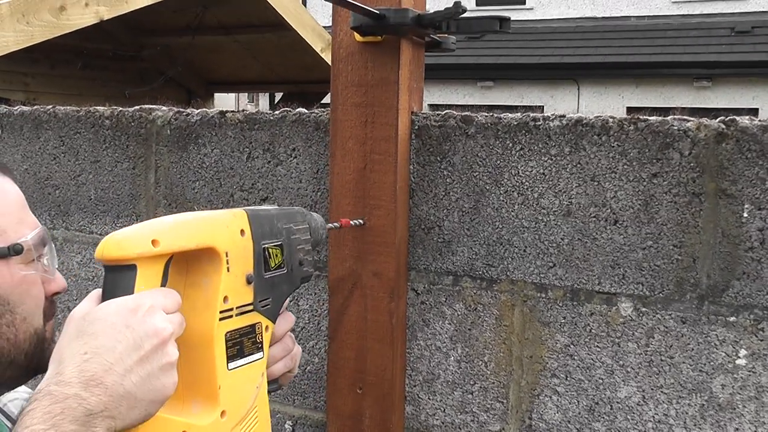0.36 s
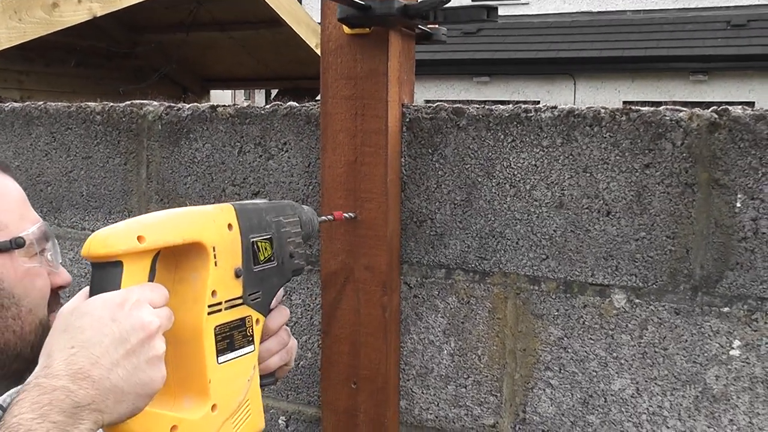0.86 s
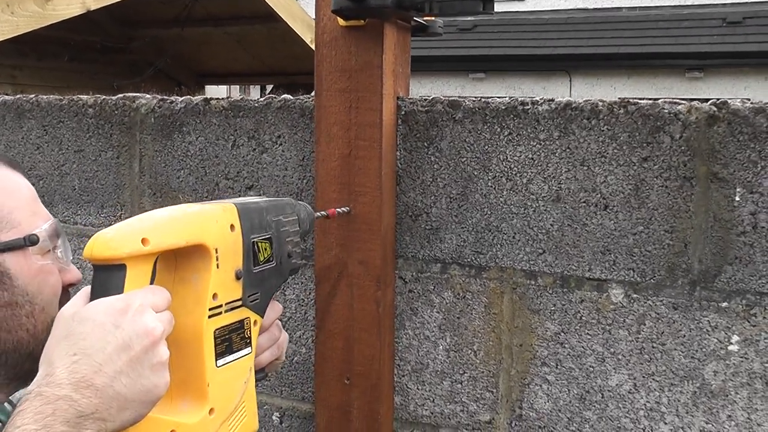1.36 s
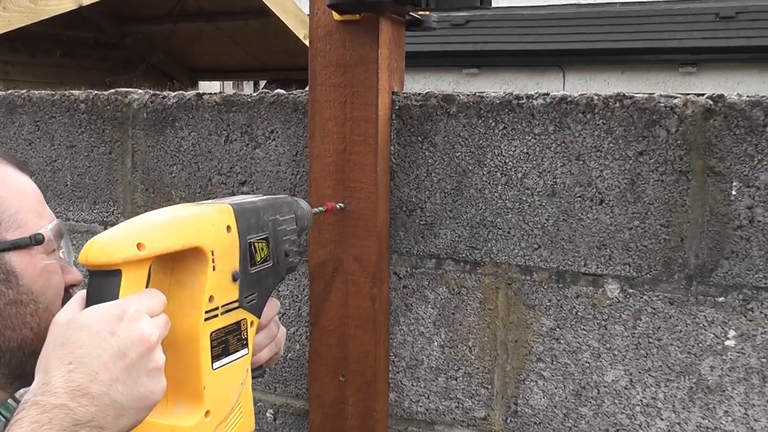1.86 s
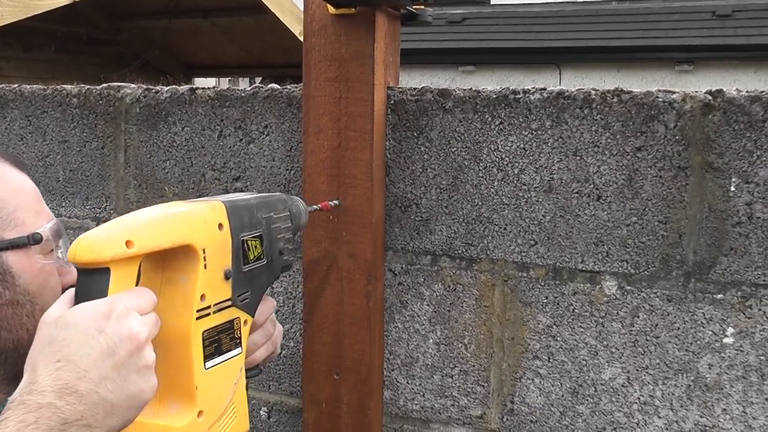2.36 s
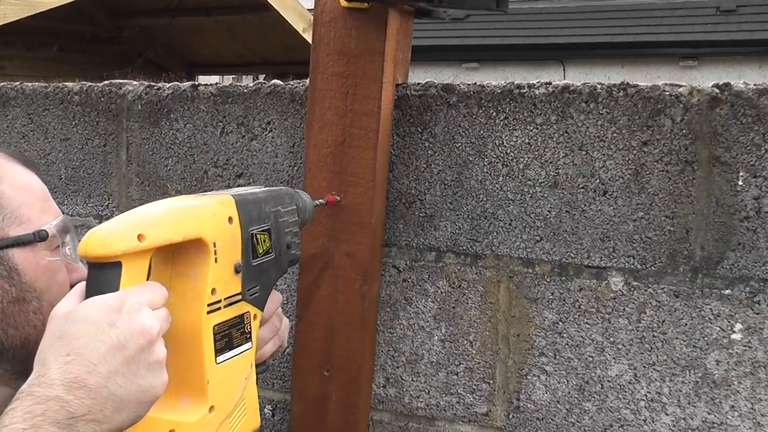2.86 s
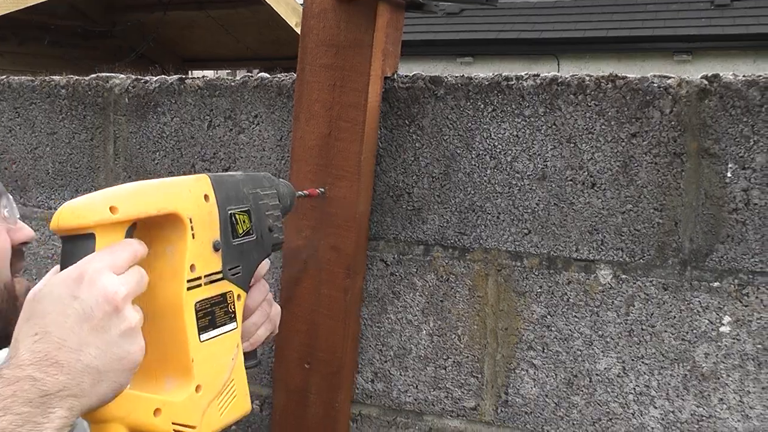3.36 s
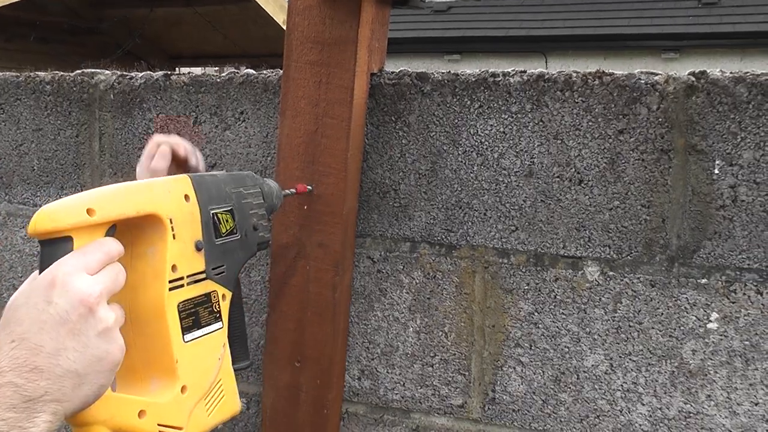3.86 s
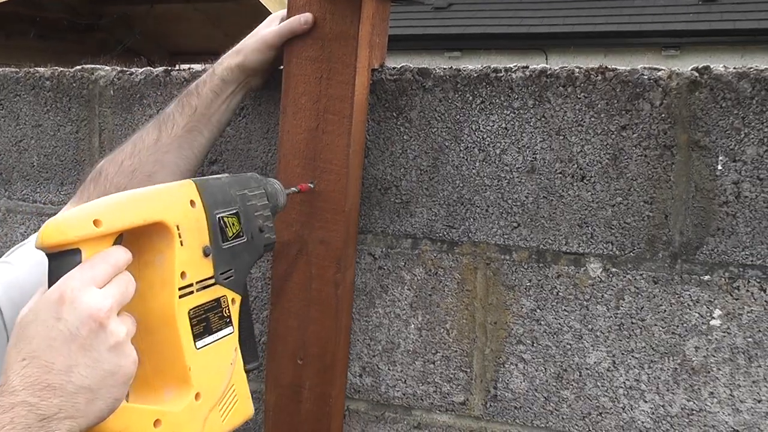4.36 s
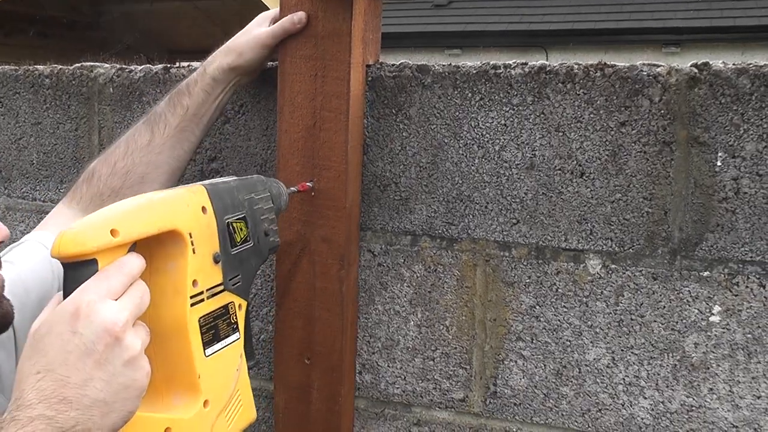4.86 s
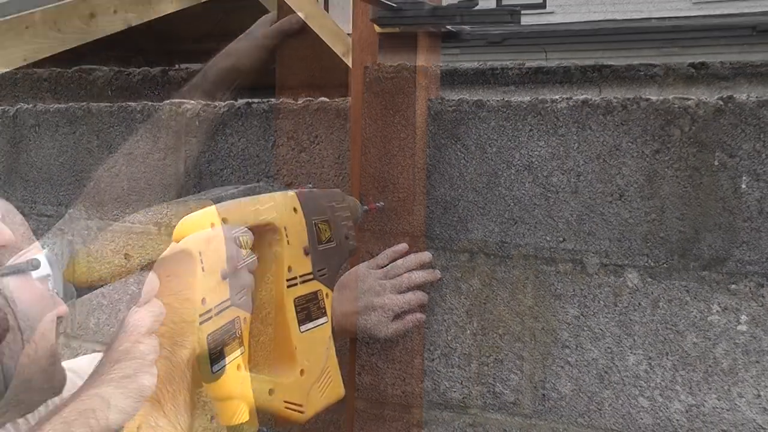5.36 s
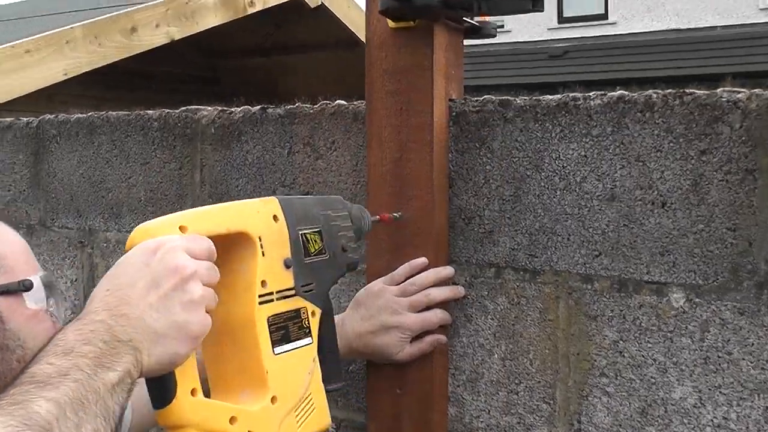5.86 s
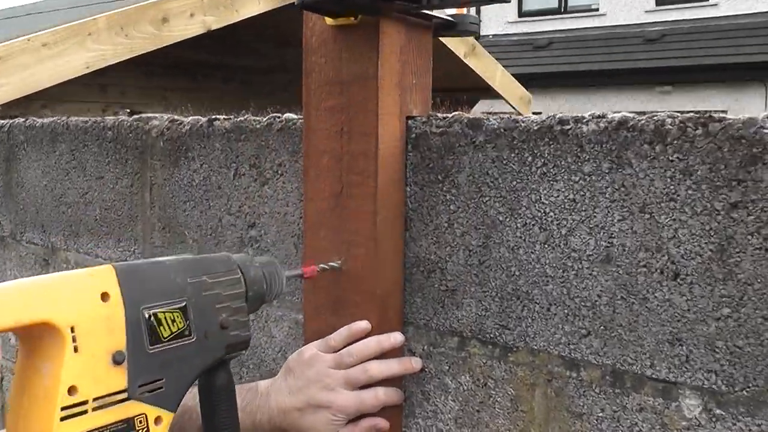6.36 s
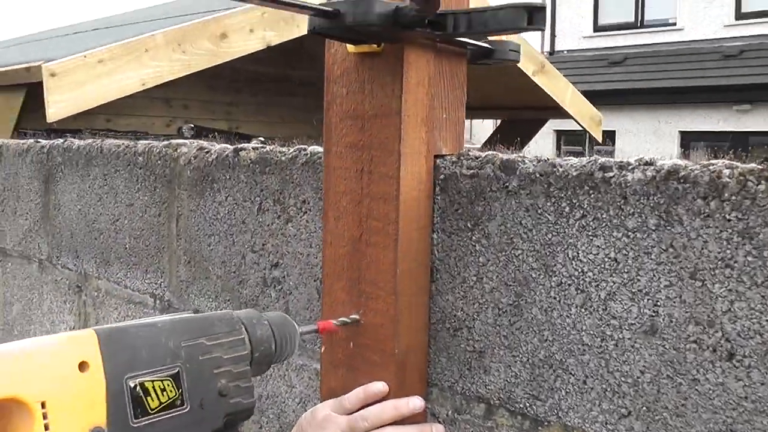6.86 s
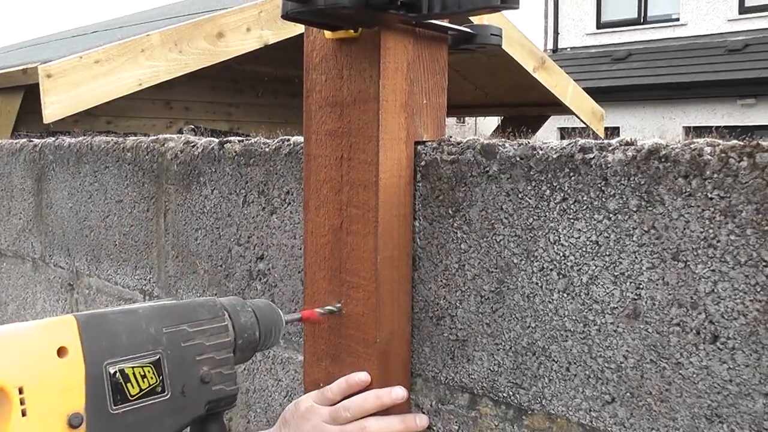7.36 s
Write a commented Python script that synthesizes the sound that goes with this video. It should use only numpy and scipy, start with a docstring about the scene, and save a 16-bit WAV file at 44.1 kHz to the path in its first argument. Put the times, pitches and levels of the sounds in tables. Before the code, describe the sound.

A corded rotary drill, near and almost centred, in a quiet yard with faint distant rumble. The motor climbs from slow chattering to rapid knocking, with metallic snaps, fan hiss and rising whine. After the trigger is released the pitch sinks and the casing clatters to a near stop. A second, steady and much quicker hammering run follows, buzzing, grinding and hissing to the end, with small pops at the microphone.

```python
"""A corded hammer drill outdoors, close to a small stereo microphone, runs up, hammers through a post into
block, coasts to a stop, then much faster strokes swell in. Noise excites casing resonances, toothed gears whine
as phase-modulated tones, and piston, striker and bit are decaying impulse trains locked to the stroke count. A
fan hisses, blows make the microphone pop as pulses of opposite and common sign at its two ports, and a faint
low rumble lies behind."""
import sys
import numpy as np
from scipy import signal
from scipy.fft import rfft, irfft, next_fast_len
from scipy.io import wavfile
from scipy.ndimage import uniform_filter1d

SR = 44100
rng = np.random.default_rng(int(sys.argv[2]) if len(sys.argv) > 2 else 0)


def to_wav(sig):
    """Store sig (one row per channel, or 1-D mono) as 16-bit WAV at the path in sys.argv[1].

    Samples outside -1..1 are clipped; the rate is SR.
    """
    pcm = np.clip(np.atleast_2d(sig), -1, 1) * 32767
    pcm = np.round(pcm).astype(np.int16)
    wavfile.write(sys.argv[1], SR, pcm.T)  # frames by channels


def volts(x):
    """Linear amplitude factor 10**(x/20) for a level x in dB, scalar or array-like."""
    e = np.asarray(x, float) / 20
    return 10 ** e


N = 329427
T = np.arange(N) / SR

# speed of the slow passage: (time [s], piston rate [strokes/s])
SLOW_SPEED = [(0.0, 10.9), (0.1, 10.55), (0.2, 9.02), (0.4, 15.53), (1.4, 31.24), (1.5, 38.6), (1.6, 44.65),
              (1.8, 51.15), (2.15, 54.91), (2.4, 54.78), (2.55, 57.95), (2.7, 62.8), (3.0, 66.2),
              (3.15, 62.58), (3.45, 47.55), (3.75, 35.94), (4.08, 25.52), (4.25, 23.17), (4.4, 18.96),
              (5.0, 5.76), (5.3, 1.49)]
# strongest microphone pops: (time [s], opposed peak [of full scale], common peak [of full scale])
STRONG_POPS = [(0.2577, -0.02, -0.0019), (0.6765, -0.046, -0.0073), (1.371, 0.027, -0.035),
               (1.4347, -0.013, -0.02), (1.463, 0.041, -0.01), (1.5168, -0.037, -0.008),
               (1.545, -0.026, 0.018), (1.5885, 0.03, -0.018), (1.6336, 0.023, -0.02),
               (1.655, 0.059, 0.004), (1.6977, 0.015, -0.014), (1.759, 0.026, -0.022),
               (1.8178, -0.019, 0.00043), (1.8562, 0.013, -0.014), (1.954, 0.021, -0.027),
               (1.99, -0.052, 0.002), (2.0088, 0.046, -0.016), (2.0827, 0.023, -0.025),
               (2.156, 0.085, -0.015), (2.1756, 0.024, -0.0046), (2.1928, -0.02, 0.0058),
               (2.2482, 0.081, -0.006), (2.2849, 0.023, -0.014), (2.3215, 0.015, -0.013),
               (2.3394, 0.037, 0.0039), (2.4303, -0.068, -0.019), (2.4474, 0.07, -0.01),
               (2.537, 0.045, -0.013), (2.5714, 0.019, 0.0022), (2.621, -0.093, 0.025),
               (2.6369, -0.018, 0.012), (2.7025, 0.058, -0.012), (2.7178, -0.051, 0.0053),
               (2.7347, -0.032, -0.017), (2.765, -0.013, -0.024), (2.797, -0.129, 0.046),
               (2.951, 0.075, -0.03), (2.9665, 0.03, -0.007), (3.0277, -0.03, -0.017),
               (3.1042, -0.119, 0.023), (3.1198, -0.047, 0.013), (3.1523, 0.045, -0.0053),
               (3.201, 0.051, -0.0071), (3.2692, 0.025, 0.00036), (3.2875, 0.03, -0.0093),
               (3.3818, 0.072, -0.016), (3.4632, 0.048, -0.017), (3.5285, 0.021, -0.00061),
               (3.5734, 0.064, -0.022), (3.6497, 0.035, 0.0072), (3.6727, 0.044, -0.013),
               (3.6978, -0.04, -0.018), (3.724, -0.043, -0.0087), (3.7802, 0.045, -0.0007),
               (3.8093, 0.052, -0.013), (3.838, 0.05, -0.01), (3.8696, 0.033, -0.0049),
               (3.9341, 0.044, -0.009), (4.0013, -0.026, -0.025), (4.039, 0.036, -0.009),
               (5.363, 0.035, -0.003), (5.425, 0.018, -0.013), (5.4625, -0.019, -0.01),
               (5.4853, 0.036, -0.012), (5.5366, 0.096, -0.0095), (5.5585, 0.049, -0.005),
               (5.5737, 0.006, -0.017), (5.61, 0.021, -0.022), (5.6384, 0.073, -0.008),
               (5.6745, 0.035, -0.0013), (5.6888, -0.017, -0.02), (5.718, 0.067, -0.0083),
               (5.7603, 0.00035, -0.024), (5.803, 0.11, -0.008), (5.818, -0.056, -0.012),
               (5.8403, 0.04, -0.02), (5.8756, -0.056, -0.01), (5.919, 0.017, -0.021),
               (5.9552, -0.053, -0.012), (5.9693, -0.042, -0.0023), (5.9985, 0.032, -0.014),
               (6.0418, 0.058, -0.021), (6.07, 0.099, -0.012), (6.1138, -0.015, -0.013),
               (6.1567, -0.052, -0.011), (6.1854, -0.013, -0.016), (6.236, 0.05, -0.016),
               (6.2722, -0.016, -0.016), (6.3518, 0.024, -0.023), (6.3807, -0.047, -0.00022),
               (6.4748, -0.11, -0.0087), (6.5763, -0.079, -0.011), (6.6267, -0.1, -0.0079),
               (6.6489, 0.062, -0.016), (6.692, -0.077, -0.0051), (6.808, 0.024, -0.025),
               (6.8806, -0.095, -0.007), (6.9307, 0.1, -0.016), (6.9456, -0.062, -0.004),
               (6.997, 0.11, -0.0067), (7.0183, 0.048, -0.000071), (7.0695, 0.1, -0.012),
               (7.091, 0.045, -0.007), (7.1054, 0.048, -0.0084), (7.1341, -0.035, -0.017),
               (7.1559, -0.03, 0.01), (7.1776, 0.073, -0.004), (7.257, 0.088, -0.0085),
               (7.2715, 0.041, 0.015), (7.2932, 0.062, -0.0066), (7.3507, 0.047, -0.0095),
               (7.3731, -0.038, -0.017), (7.4096, 0.042, -0.013), (7.4455, -0.057, -0.008),
               (7.467, 0.055, -0.016)]


def curve(table):
    """Linear interpolation gives each column of a timed table at every sample."""
    s, *columns = np.transpose(table)
    return [np.interp(T, s, c) for c in columns]


def between(pair, share):
    """Linear mixing: from the first value to the second as the share goes from 0 to 1."""
    return pair[0] + (pair[1] - pair[0]) * share


def window(t0, t1, fade_s):
    """Trapezoidal gate: 1 between the two times, fading outside."""
    return np.clip(np.minimum(T - t0, t1 - T) / fade_s + 1, 0, 1)


def noise():
    """White noise: independent Gaussian samples with a flat spectrum."""
    return rng.standard_normal(N)


def walk(rate):
    """Slow random modulation: levels drawn at the rate [1/s] and slewed, spread near 1."""
    k = int(SR / rate)
    held = np.repeat(rng.standard_normal(N // k + 1), k)
    return 1.31 * uniform_filter1d(held, k)[:N]


def ring(x, slope, modes=(), band=(20, 20000)):
    """Minimum-phase resonator: a spectral slope plus modes, scaled to rms 1 within the band [Hz]."""
    size = next_fast_len(N + 8192)
    hz = np.maximum(np.arange(4097) * SR / 8192, 1)
    slope_hz, slope_db = np.array(slope)[:, 0], np.array(slope)[:, 1]
    db = np.interp(np.log(hz), np.log(slope_hz), slope_db)
    for centre, width, peak_db in modes:
        db = db + peak_db / (1 + (2 * (hz - centre) / width) ** 2)
    # folding the cepstrum onto positive times makes the filter causal
    cepstrum = irfft(np.log(volts(db)))
    cepstrum[1:4096] *= 2
    cepstrum[4097:] = 0
    impulse = irfft(np.exp(rfft(cepstrum)))
    out = rfft(x, size) * rfft(impulse, size)
    low, high = (int(edge * size / SR) for edge in band)
    power = (np.abs(out[low:high]) ** 2).sum()
    return irfft(out, size)[:N] * np.sqrt(N * size / 2 / power)


def strokes(table, blow_s):
    """Phase is the integral of rate: the stroke count at every sample, whole at each blow."""
    count = np.cumsum(curve(table)[0]) / SR
    return count - count[int(blow_s * SR)]


def bursts(count, decay_s, scatter_db, lag=0.):
    """Impulsive excitation: an envelope that jumps once a cycle and decays, each time with its own size."""
    cycle = np.floor(count - lag).astype(int)
    starts = np.flatnonzero(np.diff(cycle, prepend=cycle[0] - 1))
    index = cycle - cycle[0]
    since = T - T[starts][index]
    size = volts(scatter_db * rng.standard_normal(len(starts)))
    return size[index] * np.exp(-since / decay_s)


def dips():
    """Exponential recovery: dB lost just after each of the hardest blows."""
    # (time [s], depth [dB])
    losses = [(1.860, 1.5), (2.798, 7), (2.953, 1.5), (3.105, 2), (3.385, 6), (3.726, 2)]
    back_s = 0.058
    return sum(-depth_db * (T > s) * np.exp(-np.maximum(T - s, 0) / back_s) for s, depth_db in losses)


def casing(count, db):
    """Forced shell vibration: the pulsed current of the speed control shakes it 96 times a second, loose gears
    rattle it per shaft turn in the coast, and it rattles at random."""
    # spectrum of the rattle: (frequency [Hz], relative density [dB])
    casing_slope = [(60, -28), (200, -35), (500, -10), (900, -12), (2000, -6), (2900, -7.5), (3500, -16.5),
                    (3900, -11), (5000, -9.5), (8500, -9.5), (12000, -29), (16000, -54)]
    # shell resonances, at first and as the grip changes in the run-down: (frequency [Hz], width [Hz], peak [dB])
    firm_modes = [(2176, 146, 4.5), (2380, 75, -9), (2577, 92, 4), (4110, 190, 6), (4455, 300, 7),
                  (5400, 150, 3), (6750, 520, 5.5), (7600, 340, 4.5), (9500, 320, 5)]
    eased_modes = [(2140, 160, 5.5), (2360, 87, -11), (2590, 147, 7.5), (4150, 220, 10), (4600, 200, 10),
                   (5370, 210, 3), (6750, 380, 9.5), (7520, 140, 8), (8000, 120, 5), (9060, 260, 8)]
    loose_modes = [(2140, 146, 7.5), (2320, 92, -6), (2630, 200, 10), (3480, 530, -4), (4160, 160, 5),
                   (4600, 340, 11.5), (5380, 130, 10.5), (6780, 230, 8), (7320, 170, 9), (7870, 190, 9.5),
                   (8830, 170, 8)]
    turns_per_stroke = 5.0
    beat = bursts(T * 96.0, decay_s=0.0011, scatter_db=7.5) * window(0, 1.65, .2)
    turn = bursts(turns_per_stroke * count, decay_s=.018, scatter_db=1.2, lag=-.1)
    turn = uniform_filter1d(turn, size=500)
    coast = window(4.78, 9, 0.39)
    push = 1.16 * (1 - .5 * coast) + 0.66 * beat + 1.66 * turn * coast
    push = push * volts(1.34 * walk(250)) * noise()
    eased, loose = window(4.15, 9, .1), window(4.72, 9, 0.11)
    grips = (1 - eased, firm_modes), (eased - loose, eased_modes), (loose, loose_modes)
    rattle = sum(share * ring(push, casing_slope, modes, band=(3800, 8000)) for share, modes in grips)
    return volts(db) * rattle


def whine(count, casing_db):
    """Gear meshing: a phase-modulated tone and late octave, rough under load and stall, coloured by the gear case."""
    # course of the whine: (time [s], level relative to the casing [dB])
    whine_level = [(0, -1.5), (.2, 2), (.32, -4.5), (.5, 2), (1.0, -6), (1.4, -4), (1.55, 4), (1.75, -1),
                   (2.5, -4), (3.65, 0.5), (4.1, -2), (4.4, -4), (4.7, -2.5), (4.97, -6.5), (5.08, -5),
                   (5.2, -0.5)]
    # how well the gear case passes the mesh tone: (frequency [Hz], relative gain [dB])
    gear_case = [(200, -55), (620, 2.5), (780, 4.5), (950, -8.5), (1100, -1.5), (1250, 6), (1400, 7.5),
                 (1600, -10), (1760, -4), (2000, 3), (2200, 3), (2330, -13), (2480, 0), (2650, 5.5),
                 (2850, -12), (3100, -16), (3600, -16), (4050, -1), (4450, 0.5), (4800, -9), (5400, 0),
                 (5900, -30), (7000, -27)]
    teeth = 108  # mesh cycles per stroke
    load = window(1.43, 3.95, 0.12) + window(5.1, 9, 0.059)
    phase = 2 * np.pi * teeth * count + .6 * walk(150) + 1.1 * load * walk(500)  # scatter in radians
    octave = volts(1) * window(4.78, 6, .1) * np.sin(2 * phase)
    tone = (np.sin(phase) + octave) * volts(2. * walk(60))
    return ring(volts(casing_db + curve(whine_level)[0]) * tone, gear_case) * volts(-43.0)


def hum(count, casing_db, hammer, octaves):
    """Broadband motor noise with shaft harmonics: rumble that grows with speed, and faint tones that come and go."""
    # spectrum of the rumble: (frequency [Hz], relative density [dB])
    hum_slope = [(40, -36), (120, -11.5), (250, -8), (500, -1.5), (800, -1), (1200, -5), (3000, -42)]
    # shaft and gear tones: (multiple of stroke rate [1], level against the hum [dB], start [s], end [s])
    shaft = [(23.5, -2, .35, 1.15), (47, -3, .6, 1.2), (10, -8, .55, 1.3), (10, -3, 1.42, 2.55),
             (15, -5, 1.7, 2.5), (20, -1, 1.7, 2.7), (4, -9, 1.9, 3.2), (6, -7, 1.6, 3.3),
             (9, -5, 2.7, 3.2), (12, -5, 2.6, 3.2), (10, -6, 3.4, 4.0), (23.5, -3, 4.1, 4.5),
             (47, -4, 4.05, 4.75)]
    free_and_hammering_db, db_per_octave = (-13.5, -9), 2.5
    db = casing_db + between(free_and_hammering_db, hammer) + db_per_octave * octaves
    rumble = ring(noise(), hum_slope, band=(200, 900))
    tones = np.zeros(N)
    for multiple, tone_db, t0, t1 in shaft:
        level = volts(tone_db + 1.4 * walk(10)) * window(t0, t1, .15)
        tones += level * np.sin(2 * np.pi * multiple * count + .5 * walk(25))
    return volts(db) * (rumble + tones)


def chatter():
    """Amplitude-modulated ring, struck at half the speed control's beat; it swells, then thins as the motor speeds up."""
    # pitch of the ring, rising as the bit bites: (time [s], frequency [Hz])
    ring_pitch = [(.7, 1700), (1.0, 1787), (1.35, 1913), (1.44, 2205), (1.5, 2440), (1.58, 2810),
                  (1.68, 3300)]
    swell_db_per_s, drop_s, tail_db = 7, 1.45, -9
    db = -27.5 + swell_db_per_s * np.minimum(T - drop_s, 0)
    db = db + tail_db * window(drop_s + 0.021, 8, 0.048)
    throb = uniform_filter1d(bursts(T * 48.0, decay_s=0.0019, scatter_db=0.3, lag=0.275), size=60)
    tone = np.sin(2 * np.pi * np.cumsum(curve(ring_pitch)[0]) / SR + .25 * walk(100))
    return volts(db) * 5 * throb * tone * window(0.88, 1.58, 0.15)


def knock(count, casing_db, hammer):
    """Impulse response of the barrel: the piston turns round half a stroke after each blow and thuds it."""
    # barrel resonances: (frequency [Hz], width [Hz], peak [dB])
    knock_modes = [(1094, 103, 9.4), (1246, 100, 5.8), (1388, 282, 20.9)]
    db = casing_db + between((-1, -2.5), hammer)  # running free, hammering
    thud = bursts(count + 0.0086 * walk(60), decay_s=0.00015, scatter_db=1.8, lag=.45) * window(1.15, 4.06, .2)
    blow = bursts(count, decay_s=0.00018, scatter_db=5.5) * window(1.4, 3.93, .2)  # the blow shakes it too
    push = 0.078 * noise() - thud + 0.34 * blow
    return volts(db - 3.0) * ring(push, [(700, -13.5), (1300, -6), (2500, -32)], knock_modes, band=(1150, 1500))


def crack(count):
    """Impact of striker on bit: a short bright snap, harder where a strong microphone pop falls."""
    # spectrum of the snap: (frequency [Hz], relative density [dB])
    bit_slope = [(300, -22), (1000, -14), (3000, -16), (7000, -15), (9000, -10), (11000, -5), (13000, -11),
                 (16000, -27)]
    # resonances of the bit: (frequency [Hz], width [Hz], peak [dB])
    bit_modes = [(10500, 600, 9), (11300, 600, 9)]
    hard = np.zeros(N)
    for s, opposed, common in STRONG_POPS:
        hard[int((s - .004) * SR):int((s + .004) * SR)] = min(9 * abs(opposed) + 12 * abs(common), .3)
    push = (1 + hard) * bursts(count, decay_s=.0007, scatter_db=2.2)
    push = uniform_filter1d(push, size=36) + .035
    snap = ring(push * noise() * window(1.24, 4.1, 0.044), bit_slope, bit_modes, band=(9500, 13000))
    pace_db = -1.5 * np.log2(curve(SLOW_SPEED)[0] / 50)  # slower blows land harder
    start_db = -10 * (1 - window(1.56, 8, 0.22))  # softer on the first blows
    return volts(-41 + start_db + .5 * dips() + pace_db + 1.3 * walk(12)) * snap


def grit(count, db):
    """Brittle fracture as modulated noise: block crumbles under the bit, most just after each blow."""
    # spectrum of the crumbling: (frequency [Hz], relative density [dB])
    grit_slope = [(800, -25), (2500, 0), (3500, 12), (5000, -20), (8000, -1), (15000, -33)]
    crumble = 0.27 + 0.66 * bursts(count, decay_s=0.0023, scatter_db=3.0)
    return volts(db) * ring(crumble * noise(), grit_slope)


def fast_knocks(count):
    """A periodic impulse train is a comb of harmonics; its resonances shift lower as the bit goes in."""
    # spectrum of the knocks: (frequency [Hz], relative density [dB])
    fast_slope = [(200, -44.5), (400, -15.5), (600, -11.5), (1300, -15), (2300, -5.5), (3500, -6),
                  (6000, -2.5), (12000, -34)]
    # rings shallow and deep in the hole: (frequency [Hz], width [Hz], peak [dB])
    high_modes = [(563, 71, 8.4), (795, 220, 12.7), (2636, 350, 13.8), (2987, 244, 16)]
    low_modes = [(580, 32, 1.6), (770, 100, 13), (1191, 176, 25.7), (1550, 170, 14), (2386, 490, 16.5),
                 (3470, 440, 5.2)]
    # balance of the two rings: (time [s], relative high level [dB], relative low level [dB])
    knock_levels = [(5.5, -36.5, -49), (5.85, -36.5, -47), (6.15, -37.5, -39.5), (6.6, -43.5, -37.5),
                    (6.9, -43.5, -40.5), (7.47, -40.5, -42.5)]
    high_db, low_db = curve(knock_levels)
    thud = .035 * noise() - bursts(count, decay_s=.00006, scatter_db=.9, lag=.42)
    high = volts(high_db) * ring(thud, fast_slope, high_modes)
    low = volts(low_db) * ring(thud, fast_slope, low_modes)
    # one more ring near the bottom of the hole
    bottom = volts(-44.5) * window(6.95, 8, .15) * ring(thud, fast_slope, [(3480, 200, 30)])
    return high + low + bottom


def fast_grind(beat, depth):
    """Friction as amplitude-modulated noise: the bit grinds twice a stroke."""
    # spectrum of the grinding: (frequency [Hz], relative density [dB])
    grind_slope = [(60, -17), (150, -17), (300, -17.5), (800, -10.5), (1300, -3), (1600, -5), (2500, -5),
                   (3500, -7), (6000, -38)]
    return volts(between((-44, -42.5), depth)) * ring(beat * noise(), grind_slope, band=(500, 1600))


def fast_shell(beat, depth):
    """Resonance under pulsed noise: the shell rings, and rings of shell and bit swell once each."""
    # spectrum of the shell: (frequency [Hz], relative density [dB])
    shell_slope = [(2500, -35), (3800, -3.5), (5400, -1), (7000, 0.5), (7800, -4.5), (9000, -8.5),
                   (16000, -44)]
    # shell resonances: (frequency [Hz], width [Hz], peak [dB])
    shell_modes = [(4440, 710, 4.5), (4990, 150, -12), (5100, 420, 7)]
    # passing rings: (frequency [Hz], width [Hz], relative level [dB], start [s], end [s])
    swells = [(2780, 350, -42, 5.6, 6.05), (2270, 280, -41, 6.08, 6.42), (5300, 400, -44, 6.15, 6.4)]
    shell = volts(between((-37.5, -38.5), depth)) * ring(beat * noise(), shell_slope, shell_modes)
    for hz, width, db, t0, t1 in swells:
        rung = ring(beat * noise(), [(20, -30), (hz, 0), (20000, -30)], [(hz, width, 30)])
        shell = shell + volts(db) * window(t0, t1, .13) * rung
    return shell


def fast_hiss(count, beat, depth):
    """Modulated noise and gear harmonics: dust hisses in step with the strokes over wavering tones."""
    # spectrum of the hiss: (frequency [Hz], relative density [dB])
    hiss_slope = [(3000, -31), (6500, -24), (8000, -2), (9300, 1.5), (11000, 0.5), (13000, 3), (14600, 5),
                  (15800, 3), (16400, -50)]
    # gear tones: (multiple of stroke rate [1], shallow level against the hiss [dB], deep level [dB])
    gear_tones = [(5.745, -15, -24), (69, -10, -13), (92, -22, -14), (105.2, -26, -24), (109.1, -18, -14)]
    hiss = ring(beat * volts(0.62 * walk(300)) * noise(), hiss_slope, band=(9000, 15500))
    for multiple, *tone_db in gear_tones:
        level = volts(between(tone_db, depth) + 3.5 * walk(8.4))
        waver = (.2 + 0.0076 * multiple) * walk(60)
        hiss = hiss + level * np.sin(2 * np.pi * multiple * count + waver)
    return volts(between((-37, -36), depth)) * hiss


def fast_passage(count):
    """Superposition: knocks, grinding, shell and hiss share one stroke count and swell in exponentially."""
    depth = window(6.45, 9, 0.41)  # the bit sinks from shallow (0) to deep (1)
    beat = 1 + .8 * bursts(2 * count, decay_s=.001, scatter_db=4.0)
    swell = volts(-27 * np.exp(-np.maximum(T - 5.182, 0) / 0.15))
    layers = fast_knocks(count) + fast_grind(beat, depth) + fast_shell(beat, depth) + fast_hiss(count, beat, depth)
    return layers * swell * window(5.22, 8, 0.082)


def fan(casing_db, hammer, octaves):
    """Turbulent flow noise: cooling air hisses, more strongly with speed."""
    # spectrum of the air: (frequency [Hz], relative density [dB])
    fan_slope = [(5000, -23), (8500, -3), (10000, -1), (12000, -0.5), (14000, -5), (16000, -26)]
    free_and_hammering_db, db_per_octave = (-8, -9), 3.5
    db = casing_db + between(free_and_hammering_db, hammer) + db_per_octave * octaves
    return volts(db) * ring(noise(), fan_slope) * window(0, 5.12, 0.082)


def pop(u, push_s, back_s):
    """Zero net displacement: a quick push of the diaphragm and a slower swing back of the same area."""
    late = np.maximum(u, 0) / back_s
    back = 4 * np.sqrt(2 * np.pi) * push_s / back_s * late ** 2 * np.exp(-2 * late)
    return np.exp(-.5 * (u / push_s) ** 2) - back


def pops(slow, fast):
    """Common and differential pressure: the common part of a pop is slower; both quicken in the faster passage."""
    # spans where any blow may pop faintly: (start [s], end [s], share of blows [1])
    faint = [(1.4, 4.05, .15), (5.35, 7.46, .1)]
    lag_s, faint_opposed, faint_common = 0.00079, 0.032, 0.0108
    rows = list(STRONG_POPS)
    for count, (t0, t1, share) in zip((slow, fast), faint):
        struck = np.diff(np.floor(count)) > 0
        blows = T[1:][struck & (T[1:] > t0) & (T[1:] < t1)] + lag_s
        pick, a, b = rng.random((len(blows), 3)).T
        opposed = faint_opposed * np.sign(a - .4) * (0.53 + .5 * a)
        heard = pick < share
        rows += list(zip(blows[heard], opposed[heard], -faint_common * b[heard]))
    out = np.zeros((2, N + 2000))
    for s, opposed_peak, common_peak in rows:
        start = int(s * SR) - 200
        u = (np.arange(1200) / SR + start / SR - s) * (1 if s < 5.2 else 1.7)
        common = common_peak * pop(u, 0.00064, 0.0032)
        opposed = opposed_peak * pop(u, 0.00032, 0.0017)
        out[:, start:start + 1200] += [common + opposed, common - opposed]
    return out[:, :N]


def port_difference(body, treble):
    """Interchannel difference: scattered sound reaches the ports by unlike paths; the left port faces the bit."""
    # colour of the scattered sound: (frequency [Hz], relative gain [dB])
    port_slope = [(60, 3), (300, -16), (700, -8), (1200, -17), (2200, -12), (3000, -20), (3800, -32),
                  (16000, -67)]
    # sound scattered from wall and shed
    paths = rng.standard_normal(2000) * np.exp(-np.arange(2000) / SR / 0.011)
    scattered = ring(signal.fftconvolve(body, paths)[:N], port_slope) * volts(-55.5)
    # the left port hears the top a little otherwise
    highpass = signal.butter(2, 9500, "high", fs=SR, output="sos")
    top = signal.sosfiltfilt(highpass, np.roll(treble, shift=1) + .6 * treble)
    return scattered + .025 * body + volts(-10.5) * top


def yard():
    """Incoherent ambient field: distant rumble, independent at the two ports."""
    # spectrum of the rumble: (frequency [Hz], relative density [dB])
    yard_slope = [(30, -28), (60, -9), (120, -3), (250, -3.5), (600, -12.5), (4000, -58)]
    return volts(-61) * np.array([ring(noise(), yard_slope), ring(noise(), yard_slope)])


def scene():
    """Sum and difference stereo: the drill nearly straight ahead; the ports differ in the bass and the top."""
    # speed of the faster passage: (time [s], piston rate [strokes/s])
    fast_speed = [(5.3, 118.05), (5.35, 126.34), (5.42, 131.6), (5.6, 138.3), (5.75, 139.13), (6.0, 139.03),
                  (6.25, 138.28), (7.0, 137.9), (7.46, 138.1)]
    # casing rattle in the slow passage, which other layers follow: (time [s], relative level [dB])
    casing_level = [(0, -33), (.3, -33), (.9, -32.5), (1.53, -34), (1.8, -39), (2.47, -37), (2.78, -37.5),
                    (2.93, -33.5), (3.0, -37.5), (3.35, -38.5), (3.9, -37.5), (4.1, -37.5), (4.3, -30.5),
                    (4.64, -34.5), (4.92, -35), (5.07, -36.5), (5.16, -41), (5.32, -60)]
    # bass loss of the microphone: (frequency [Hz], relative gain [dB])
    mic_response = [(30, -27), (100, -7), (200, -1), (400, 0), (16000, 0)]
    # one blow of each passage sets the beat
    slow_count, fast_count = strokes(SLOW_SPEED, 2.9503), strokes(fast_speed, 7.2563)
    casing_db = curve(casing_level)[0] + dips()
    hammer = window(1.59, 4.13, 0.28)  # the bit hammers in block
    octaves = np.log2(np.minimum(curve(SLOW_SPEED)[0] / 25, 1))  # below 25 strokes/s
    slow = casing(slow_count, casing_db) + whine(slow_count, casing_db)
    slow = slow + hum(slow_count, casing_db, hammer, octaves) + knock(slow_count, casing_db, hammer)
    slow = slow + hammer * grit(slow_count, casing_db - 10.5)
    passages = slow * window(0, 5.24, 0.14) + chatter() + fast_passage(fast_count)
    body = ring(passages, mic_response) * volts(-31.0)
    treble = fan(casing_db, hammer, octaves) + crack(slow_count)
    left_right = np.array([[1], [-1]])
    stereo = body + treble + left_right * port_difference(body, treble)
    return stereo + pops(slow_count, fast_count) + yard()


def band_limit(x):
    """A steep low-pass at the top of the band."""
    return signal.sosfilt(signal.butter(12, 16650, fs=SR, output="sos"), x)


def record(dry):
    """Saturation: the input rounds the sharpest peaks towards its limit."""
    limit = 0.43  # of full scale
    mix = limit * np.tanh(dry / limit)
    return band_limit(mix)


dry = scene()
out = record(dry)
to_wav(out)
```